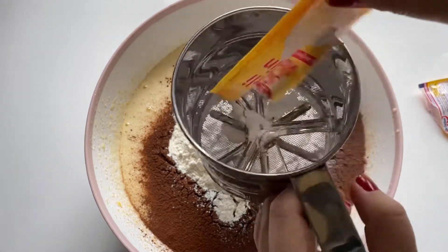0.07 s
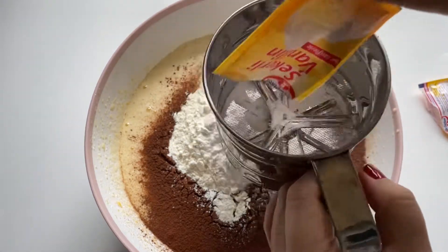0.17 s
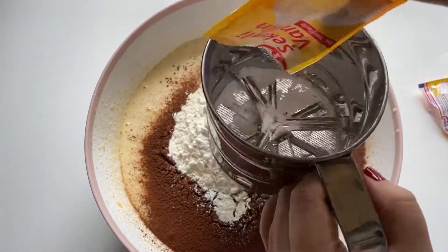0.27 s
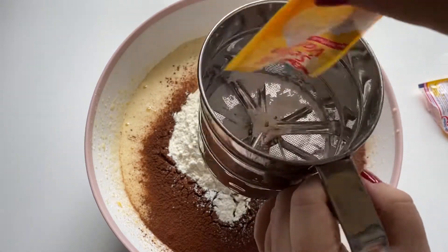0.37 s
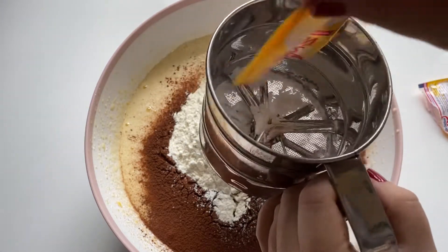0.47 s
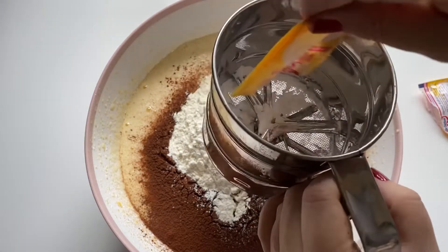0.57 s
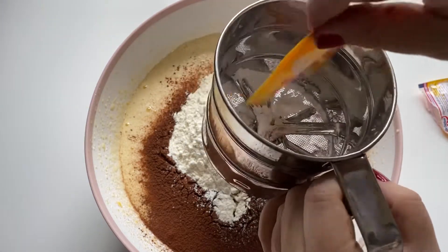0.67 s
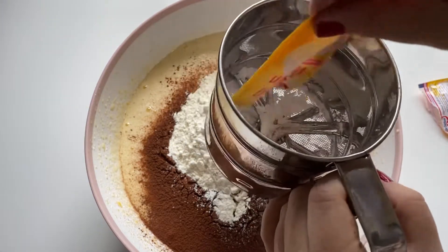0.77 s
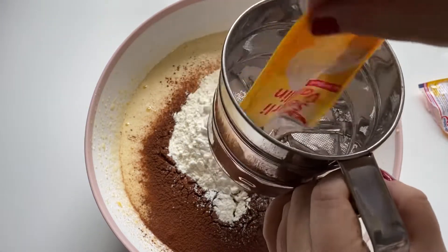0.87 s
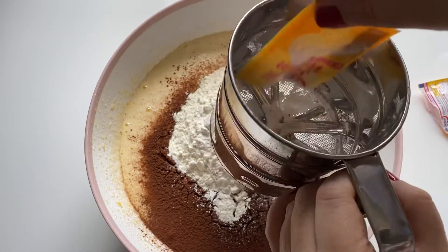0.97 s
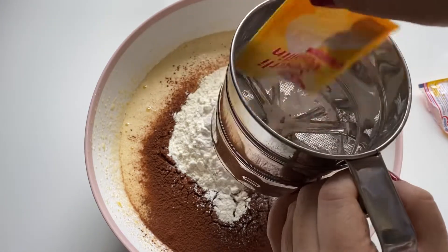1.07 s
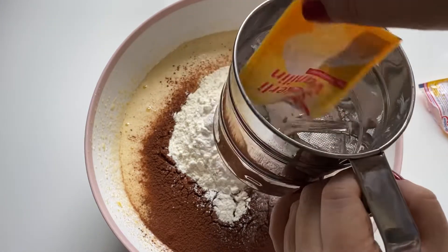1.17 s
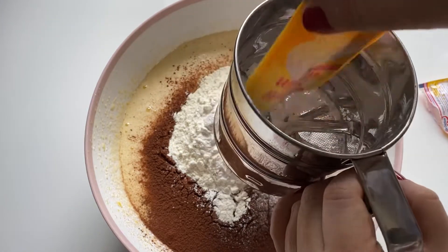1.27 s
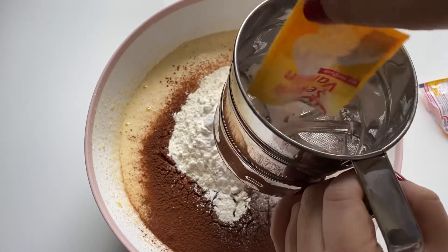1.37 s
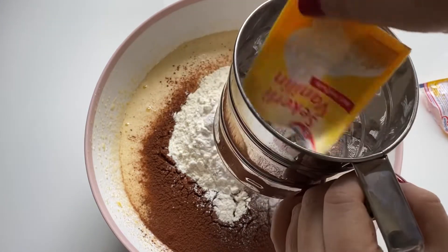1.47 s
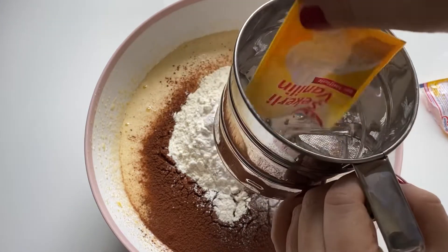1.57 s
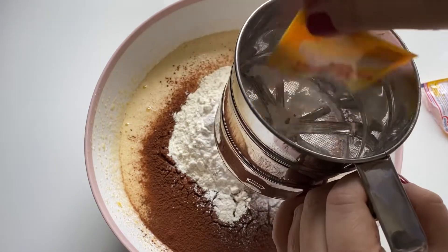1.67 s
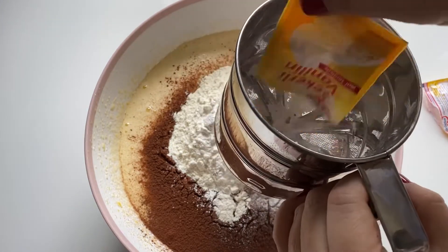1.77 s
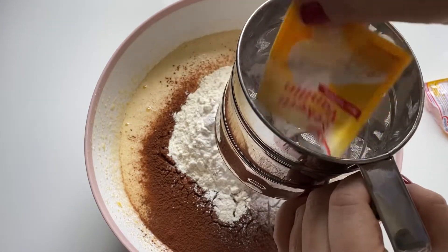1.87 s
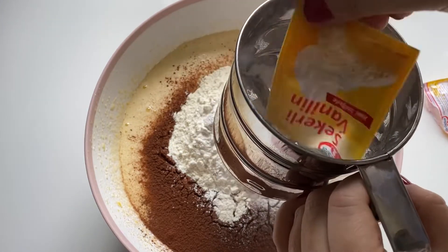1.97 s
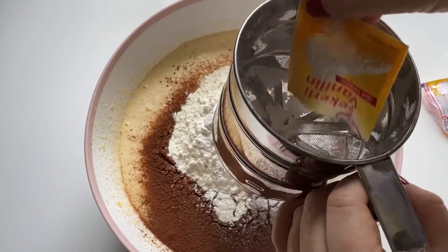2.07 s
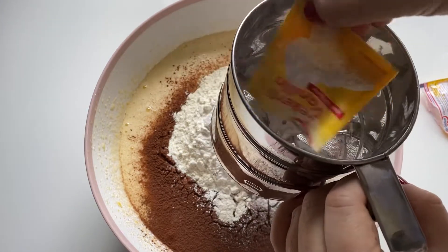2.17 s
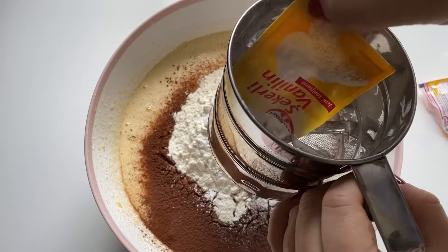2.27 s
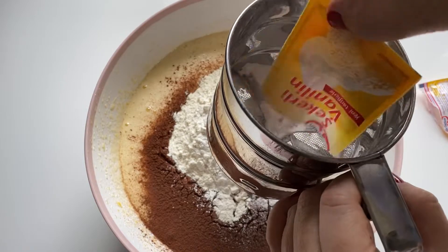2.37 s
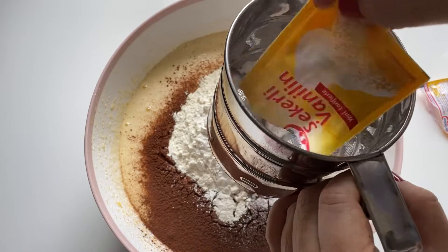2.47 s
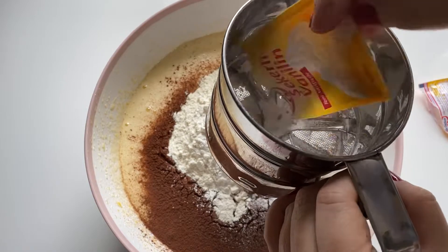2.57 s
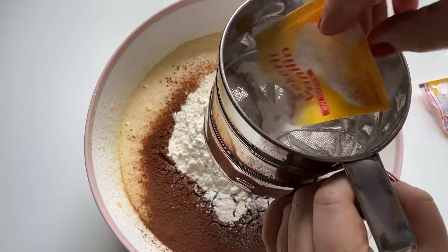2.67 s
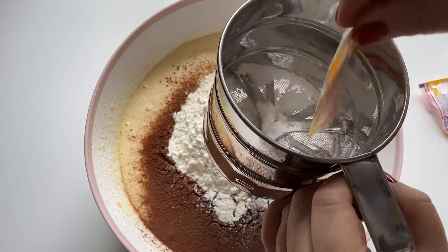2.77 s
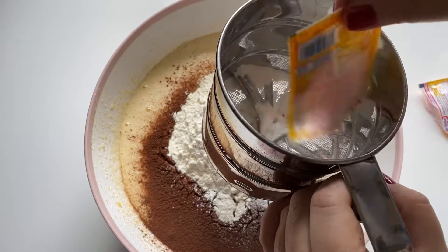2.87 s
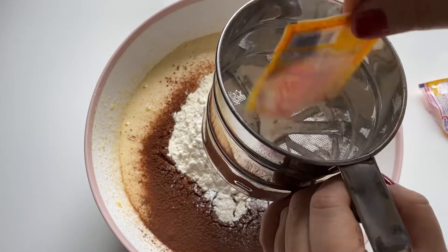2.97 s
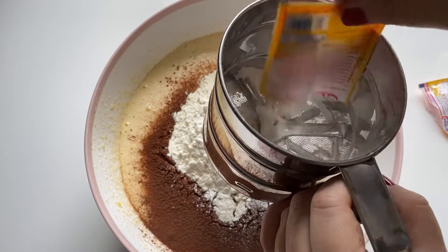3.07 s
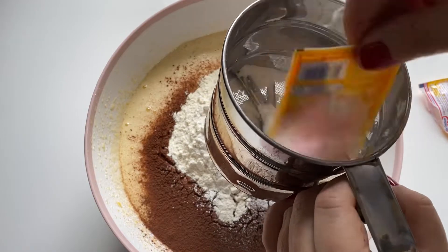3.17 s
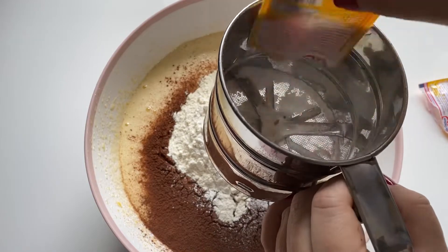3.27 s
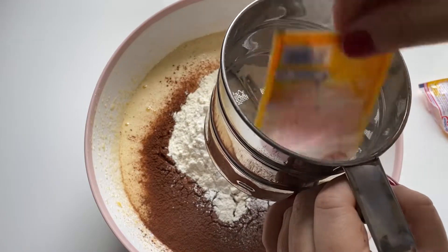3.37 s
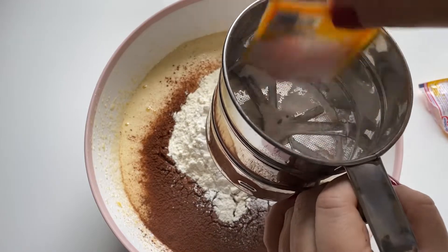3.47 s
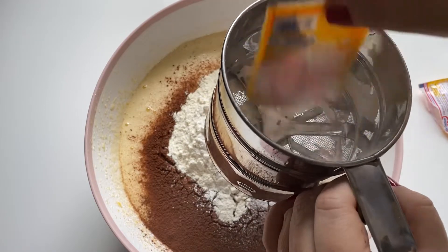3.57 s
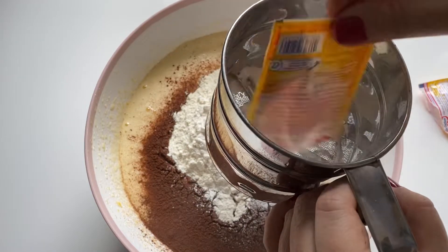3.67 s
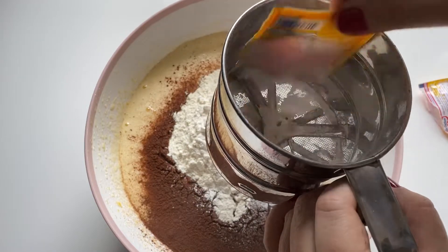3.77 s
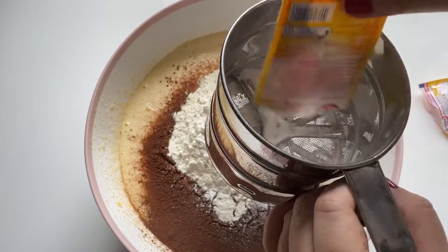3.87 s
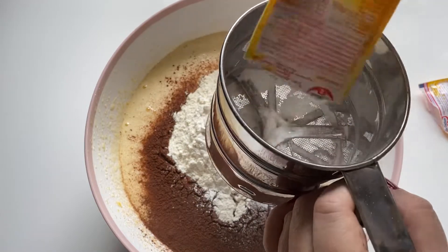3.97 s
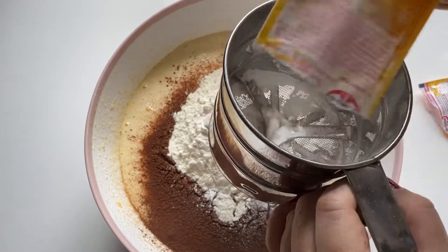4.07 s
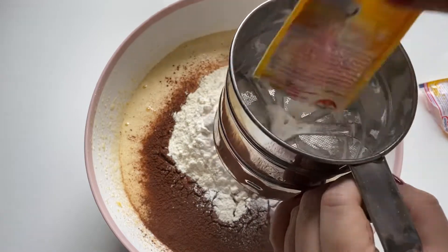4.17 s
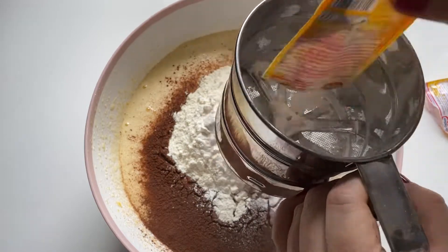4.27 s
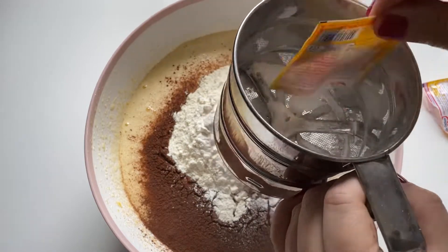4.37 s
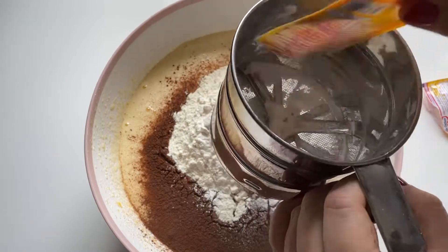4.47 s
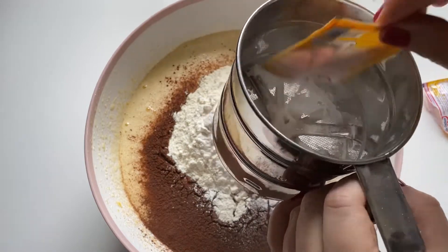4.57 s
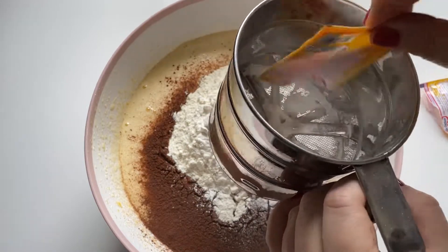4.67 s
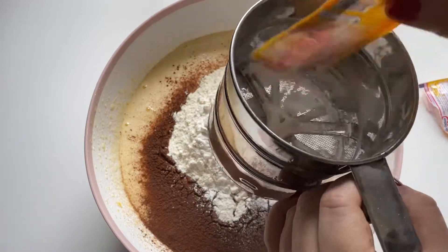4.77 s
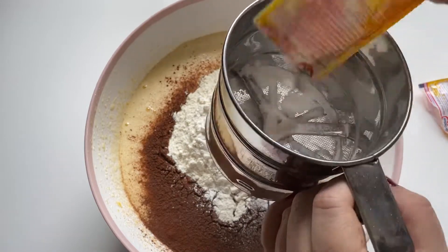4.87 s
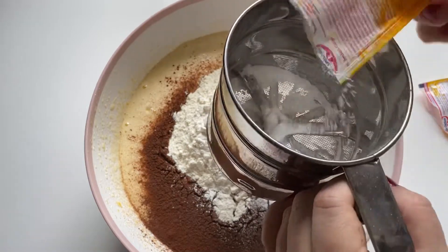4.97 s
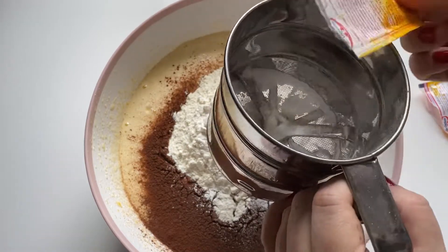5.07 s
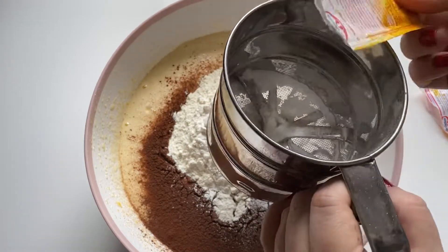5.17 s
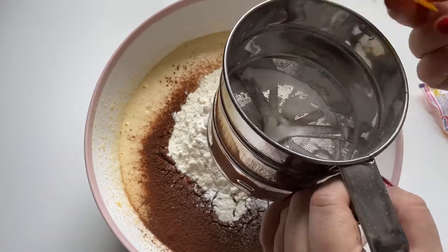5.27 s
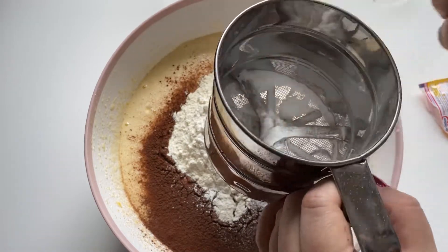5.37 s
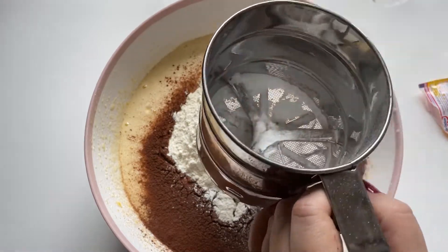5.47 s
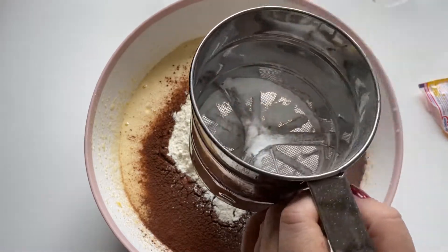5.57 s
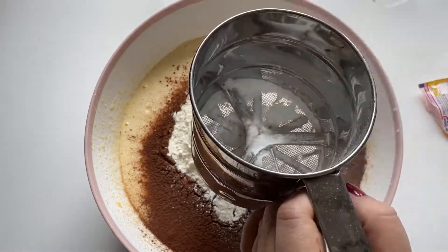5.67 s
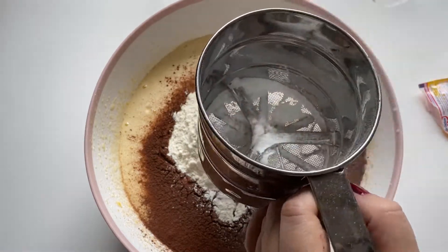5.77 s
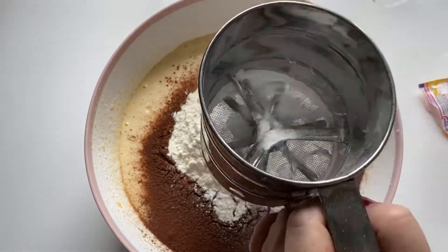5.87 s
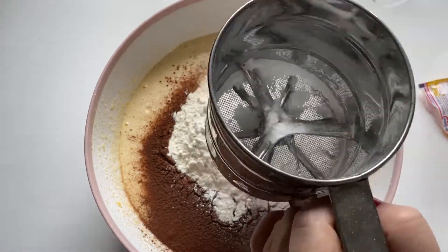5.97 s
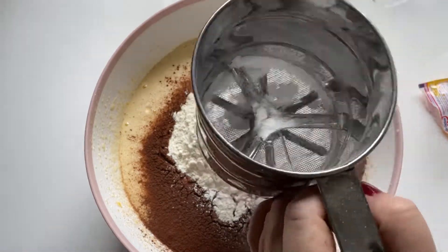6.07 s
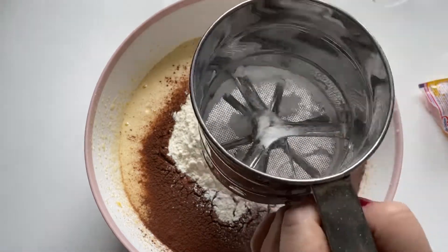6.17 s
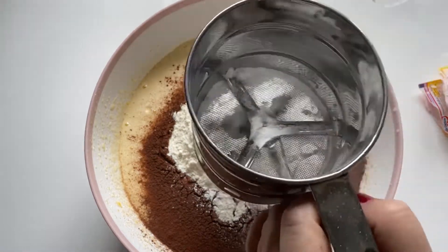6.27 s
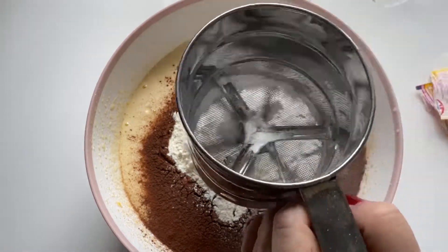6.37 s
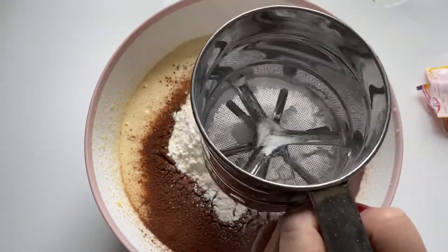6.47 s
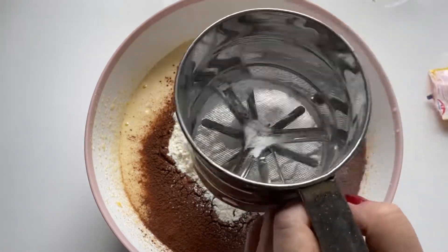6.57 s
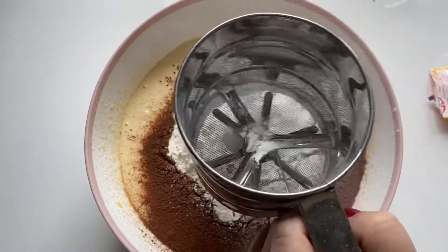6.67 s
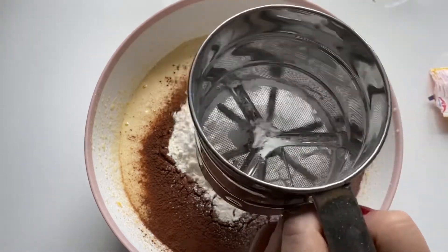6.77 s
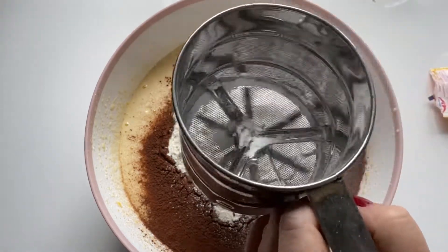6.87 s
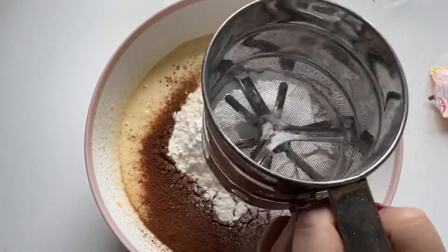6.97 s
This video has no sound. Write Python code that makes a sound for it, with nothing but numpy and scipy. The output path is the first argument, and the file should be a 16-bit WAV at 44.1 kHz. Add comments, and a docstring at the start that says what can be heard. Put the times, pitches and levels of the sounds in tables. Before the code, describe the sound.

Close up in a small kitchen, paper crinkles and flaps as a sachet is shaken, with soft hisses of sugar and a few dry taps against a steel sifter. The rustling thins out and stops. Then comes the louder sound of the sifter being worked, four quick squeezes of scraping wire and sharp, ringing metal clacks. An appliance hums faintly underneath.

```python
"""Paper crackles and sugar trickles: a sachet is shaken empty over a steel flour sifter, and each
shake buckles the paper and lets it snap back. Then the sifter's handle is squeezed four times:
its stirring wires rasp over the mesh, clack against a stop and spring back, ringing the steel can.
An appliance hums low in the small kitchen. The two ports (openings) of a close microphone
hear it all slightly apart in time."""
import sys
import numpy as np
from scipy import signal
from scipy.fft import rfft, irfft, next_fast_len
from scipy.io import wavfile
from scipy.ndimage import uniform_filter1d, map_coordinates

SR = 44100
rng = np.random.default_rng(int(sys.argv[2]) if len(sys.argv) > 2 else 0)


def digitize_waveform(pressure):
    """Quantize a signal to 16-bit integers and store it at the path in sys.argv[1].

    Rows of a 2-D input are taken as channels; values are limited to [-1, 1].
    """
    field = np.atleast_2d(pressure).T
    bounded = np.clip(field, -1, 1)
    quanta = np.round(bounded * 32767).astype(np.int16)
    wavfile.write(sys.argv[1], SR, quanta)


N = 309582

# each shake buckles one panel of the sachet, crumples the paper and lets the panel snap back:
# (buckle time [s], rebound time [s], buckle [dB], crumple [dB], rebound [dB], panel pitch [Hz])
SHAKES = [(0.851, 0.888, -40.5, -44.5, -53, 4830), (0.9139, 0.934, -46, -42, -30.5, 4930),
          (1.0006, 1.0328, -35, -50, -29.5, 4030), (1.064, 1.085, -37, -48, -26, 9750),
          (1.1515, 1.1833, -35.5, -32.5, -28, 970), (1.2283, 1.2397, -34, -37.5, -30, 2225),
          (1.3077, 1.3186, -34, -40.5, -29.5, 1700), (1.357, 1.3746, -36.5, -35.5, -30, 5814),
          (1.4377, 1.4562, -25.5, -33, -36, 4830), (1.511, 1.5266, -24, -35, -25, 2332),
          (1.561, 1.5768, -34.5, -35.5, -31, 4630), (1.6228, 1.6424, -33, -36.5, -37.5, 2208),
          (1.6816, 1.7066, -38, -38, -26.5, 1810), (2.3349, 2.3493, -39.5, -59, -46, 898),
          (2.5204, 2.5462, -29, -41.5, -21, 9360), (2.883, 2.9257, -39, -51, -46, 890),
          (2.9866, 3.015, -42, -50, -44, 1693), (3.047, 3.0706, -25, -33, -24.5, 2069),
          (3.108, 3.1154, -37.5, -45, -30, 9800), (3.1685, 3.192, -33, -44, -36, 4798),
          (3.2524, 3.2841, -35.5, -45.5, -35.5, 3040), (3.3412, 3.3551, -31, -38.5, -32.5, 883.4),
          (3.4127, 3.4206, -31.5, -35.5, -31, 3478), (3.507, 3.525, -33.5, -39, -41.5, 1270),
          (3.583, 3.594, -30.5, -42.5, -51, 10640), (3.6472, 3.6686, -33.5, -38.5, -31.5, 4900),
          (3.7266, 3.7399, -33, -42, -37.5, 1695), (3.787, 3.804, -42.5, -40, -33.5, 2671),
          (3.8733, 3.8931, -32, -55, -42.5, 8802), (4.081, 4.0959, -52.5, -63, -47, 801),
          (4.184, 4.215, -49.5, -54, -44.5, 2692), (4.4795, 4.496, -40.5, -51, -35, 10670)]
# tone of cracking paper: (frequency [Hz], relative level [dB])
PAPER = [(60, -14), (250, -1.5), (560, -7.5), (780, 0.5), (1500, -0.5), (2200, -0.5), (2800, -0.5),
         (4800, 3.5), (8000, -2), (10500, -3), (13600, -9.5), (16000, -13.5)]
# each squeeze takes up the slack with a catch, rasps over the mesh and hits the stop:
# (catch time [s], stop time [s], catch [dB], rasp [dB], clack [dB])
SQUEEZES = [(6.005, 6.032, -35, -25, -14.5), (6.2543, 6.2762, -25.5, -22.5, -14.5),
            (6.5278, 6.5502, -26, -22, -15.5), (6.773, 6.794, -35, -23.5, -14.5)]
# the spring pulls the wires back and the loose linkage knocks:
# (start [s], length [s], rasp [dB], knock time [s], knock [dB])
RETURNS = [(5.79, 0.12, -24.5, 5.872, -26.5), (6.085, 0.093, -24.5, 6.172, -22.5),
           (6.333, 0.12, -23.5, 6.355, -30), (6.603, 0.094, -24.5, 6.618, -37),
           (6.848, .11, -30.5, 6.875, -26.5)]


def paper_snaps(panel_db=8, panel_octaves=.25, t60=.014, shortening=.15, flutter_db=-21):
    """Each buckle creeps, cracks with one ringing panel and flutters on; bright cracks are shortest."""
    out, t = np.zeros(N), np.arange(SR // 12) / SR
    for s, db, tilt, ring_hz in buckles():
        def tone(hz):
            panel = panel_db * np.exp(-(np.log2((hz + 1) / ring_hz) / panel_octaves) ** 2)
            return amp(along(PAPER, hz) + tilt * np.log2((hz + 300) / 3000) + panel)
        crack, flutter, creep = filtered(rng.standard_normal((3, len(t))), tone)
        # the slow bending around the crack is duller than the crack itself
        flutter, creep = filtered(np.array([flutter, creep]), lambda hz: 1 / np.hypot(1, hz / 7000))
        ragged = amp(4 * map_coordinates(rng.standard_normal(40), [t * 400]))
        crack = crack * fade(t, .00012, t60 * np.exp(-shortening * tilt))
        flutter = amp(flutter_db) * flutter * ragged * fade(t, .0015, .053)
        add(out, s, amp(db) * struck(crack + flutter))
        # the crease gives way little by little just before it snaps, more softly if the snap is bright
        creep = struck(creep * ragged[::-1] * fade(t, .0001, .021))[:SR // 40][::-1]
        add(out, s - len(creep) / SR, amp(db - 17.5 - 1.1 * tilt) * creep)
    return out


def buckles(crumples_per_s=90, scatter_db=3.5, low_hz=1200, high_hz=9000, rebound_tilt=.83):
    """Lists every buckle of the paper, from single snaps and from shakes, in the columns below."""
    # single paper snaps, between or during the shakes:
    # (time [s], level [dB], brightness [dB per octave], panel pitch [Hz])
    single_snaps = [(.056, -38.5, 0, 3030), (.3654, -44.5, -3.5, 3570), (.4236, -44.5, 1, 5100),
                    (.4811, -46, -1.5, 2080), (.5958, -44.5, -2.5, 1040), (.6454, -44.5, -2, 1300),
                    (.776, -54.5, -4, 1300), (.871, -41, 3.5, 2200), (1.11, -38, 4, 10500),
                    (1.771, -31, 0.5, 8800), (1.8309, -32, 2, 1754), (1.9514, -36, 11, 10540),
                    (2.2297, -46.5, -2.5, 5990), (2.593, -47, -2, 2810), (2.6693, -41.5, 0, 2200),
                    (3.388, -42.5, 2, 1300), (3.9612, -46, -5.5, 1640), (4.3432, -39, 1, 8550),
                    (4.4215, -46, 1, 8080), (4.5106, -36, 0.5, 6110), (4.576, -48.5, -3, 1300),
                    (4.8901, -40.5, -0.5, 6070), (5.01, -43.5, -2, 1740)]
    rows = list(single_snaps)
    tilt = lambda db: .2129 * (db + 34.5)  # harder snaps are brighter
    chance = rng.random((len(SHAKES), 12, 3))
    for (s, end, buckle_db, crumple_db, rebound_db, hz), draws in zip(SHAKES, chance):
        rows.append((s, buckle_db, tilt(buckle_db), hz))
        rows.append((end, rebound_db, tilt(rebound_db) + rebound_tilt, hz))
        span = end - s + .004  # small crumples go on until just after the rebound
        count = max(1, int(span * crumples_per_s))
        for k, (when, size, panel) in enumerate(draws[:count]):
            start = s + span * (k + .5 + when / 2) / count
            db = crumple_db + scatter_db * (2 * size - 1)
            rows.append((start, db, tilt(db), low_hz * (high_hz / low_hz) ** panel))
    return rows


def pouring(rub_db=-1, crinkle_db=-4, trickle_db=2, throw_lag_s=.014):
    """The flexing sachet rustles and crinkles while sugar slides out onto the mesh."""
    # how much the hand flexes the sachet: (time [s], level [dB])
    flexing = [(0.0, -61), (0.37, -62), (0.69, -65), (0.91, -51), (1.04, -50), (1.57, -50.5), (1.95, -64.5),
               (2.91, -62), (3.04, -69), (3.25, -56.5), (3.35, -57), (3.75, -50), (3.96, -56.5),
               (4.18, -67), (4.39, -66.5), (4.51, -64), (5.19, -73), (5.75, -74)]
    # runs of sugar slide out: (middle [s], half length [s], trickle on mesh [dB], rub on paper [dB])
    pours = [(0.048, 0.054, -70, -54.5), (0.501, 0.016, -55.5, -62), (0.68, 0.034, -60, -59.5),
             (1.946, 0.058, -60, -57.5), (2.1, .059, -58.5, -65), (2.263, 0.12, -63.5, -60),
             (2.55, .08, -68.5, -54), (2.703, 0.036, -53, -56.5), (2.895, 0.053, -52, -56),
             (3.015, 0.035, -50, -60), (4.222, 0.057, -56, -60.5), (4.395, 0.052, -57, -63),
             (4.542, 0.053, -53, -53.5), (4.683, 0.05, -53.5, -54.5), (4.887, 0.085, -61.5, -58.5),
             (5.565, 0.063, -75.5, -84.5)]
    # tones of rubbing paper and of falling sugar: (frequency [Hz], relative level [dB])
    rub_tone = [(80, -9.5), (300, 3), (560, -1.5), (780, 7.5), (1400, -7.5), (2150, 0), (2800, -5.5),
                (4800, -1), (8000, -14), (16000, -23)]
    sugar_tone = [(200, -48), (1500, -1), (3500, -14), (6000, -9), (9500, 6), (12000, -1.5), (16000, 0)]
    t = np.arange(N) / SR
    flexed = amp(np.interp(t, *np.transpose(flexing)))
    # each shake throws some sugar a moment later
    thrown = sum(amp(db) * swell(t, s + throw_lag_s, .012) for s, _, _, db, _, _ in SHAKES)
    poured, rubbed = sum(amp(levels)[:, None] * swell(t, s, length) for s, length, *levels in pours)
    rustle = amp(-9) * flexed + amp(-7.5) * thrown + rubbed
    trickle = amp(-13.5) * flexed + amp(-29) * thrown + poured
    rub = shifting(coloured(grains(rate=3500, spread_db=5), rub_tone), depth_db=3.5)
    rub = unit(rub * amp(2.5 * wobble(90)))
    tiny_cracks = signal.fftconvolve(grains(rate=70, spread_db=3), fade(t[:SR // 50], .0002, .012))[:N]
    crinkle = unit(tiny_cracks * shifting(coloured(rng.standard_normal(N), PAPER), depth_db=4))
    sugar = unit(coloured(grains(rate=7000, spread_db=4), sugar_tone) * amp(1.5 * wobble(60)))
    return rustle * (amp(rub_db) * rub + amp(crinkle_db) * crinkle) + amp(trickle_db) * trickle * sugar


def mesh_rasp(sharpness=2.65, lead_s=.022, overrun_s=.038):
    """The wires skip and catch on the mesh, loudest where each sweep is fastest."""
    tone = [(50, -40), (180, -6.5), (400, -12.5), (620, -16.5), (950, -6), (1550, -3), (2400, 1.5),
            (4400, -1.5), (6000, 4.5), (7500, -4.5), (9500, 5), (11500, -2.5), (15700, -4)]  # scraped wire mesh: (frequency [Hz], relative level [dB])
    # the wires move from before the catch until after the stop
    sweeps = [(catch - lead_s, lead_s + stop - catch + overrun_s, db)
              for catch, stop, _, db, _ in SQUEEZES]
    sweeps += [row[:3] for row in RETURNS]
    loudness = np.zeros(N)
    for s, length, db in sweeps:
        speed = np.abs(np.sin(np.linspace(0, np.pi, int(length * SR))))
        add(loudness, s, amp(db) * speed ** sharpness)
    scrape = shifting(coloured(grains(rate=7500, spread_db=4), tone), depth_db=2.8)
    return loudness * unit(scrape * amp(2 * wobble(450)))


def linkage_clacks(stop_t60=.046, knock_t60=.075, chatter_db=-11, chatter_t60=.11):
    """The linkage hits a stop and its loose parts chatter; the crack is longer on the slack way back."""
    tone = [(60, -27), (200, -1), (600, -6), (950, 0), (1500, -3), (2500, 5.5), (5700, 6), (8000, 6.5),
            (11000, 7), (16000, -0.5)]  # a blow on the stop: (frequency [Hz], relative level [dB])
    out, t = np.zeros(N), np.arange(SR // 8) / SR
    blows = [(s, db, stop_t60) for s, db in squeeze_blows()]
    blows += [(s, db, knock_t60) for *_, s, db in RETURNS]
    for s, db, t60 in blows:
        crack, chatter = coloured(rng.standard_normal((2, len(t))), tone)
        blow = crack * fade(t, .00015, t60) + amp(chatter_db) * chatter * fade(t, .0015, chatter_t60)
        add(out, s, amp(db) * struck(blow))
    return out


def stop_pings(t60=.016):
    """The stop itself pings, damped at once by the hand around it."""
    out, t = np.zeros(N), np.arange(SR // 20) / SR
    for s, db in squeeze_blows():
        hz = rng.normal(5740, 50)
        add(out, s, amp(db) * struck(np.sin(2 * np.pi * hz * t) * fade(t, .00078, t60)))
    return out


def squeeze_blows():
    """Lists the catch and the final clack of each squeeze: (time [s], level [dB])."""
    return [blow for catch, stop, catch_db, _, clack_db in SQUEEZES
            for blow in [(catch, catch_db), (stop, clack_db)]]


def steel_can(x):
    """The thin steel wall rings with whatever scrapes or strikes it."""
    notes = [(990, 0, .03), (1160, 10, .13), (1446, 9, .1), (1800, -3, .04), (1876, 6, .07), (1950, 0, .05),
             (2144, -2, .08), (2354, 3, .08), (2425, 5, .11), (2545, -4, .06), (2680, -1, .06),
             (3100, -6, .05), (3418, 3, .13), (3622, 6, .14), (3700, 3, .11), (4199, -2, .08),
             (4830, -10, .07), (5002, 0, .1), (5300, 0, .04), (5600, -6, .03), (5990, -4, .05),
             (8480, -4, .05), (9454, -6, .05), (9824, -6, .06)]  # the wall's own notes: (pitch [Hz], boost [dB], time to fade by 60 dB [s])
    t = np.arange(SR // 5) / SR
    ring = np.zeros(len(t))
    for hz, db, t60 in notes:
        damping = np.log(1000) / t60
        ring += amp(db) * 2 * damping / SR * np.cos(2 * np.pi * hz * t) * np.exp(-damping * t)
    return signal.fftconvolve(x, ring)[:N]


def edge_taps(width_octaves=.38, t60=.016):
    """The stiff edge of the sachet knocks on the sifter's wall, dry and hollow."""
    taps = [(1.83, -33.5, 1903), (1.9519, -42.5, 1920), (2.469, -50.5, 1811), (2.828, -51.5, 2000),
            (5.0122, -44.5, 1806)]  # each knock: (time [s], level [dB], pitch [Hz])
    out, t = np.zeros(N), np.arange(SR // 12) / SR
    for s, db, pitch in taps:
        band = lambda hz: 1 / (1 + (np.log2((hz + 1) / pitch) / width_octaves * 2) ** 2)
        hollow = filtered(rng.standard_normal(len(t)), band)
        add(out, s, amp(db) * struck(hollow * fade(t, .0002, t60)))
    return out


def air_puffs(low_hz=55, high_hz=330, swing_hz=54, swing_db=-1):
    """The flat of the sachet flaps: a dull burst of air, then a low swing."""
    puffs = [(3.168, -28.5), (3.337, -28), (3.509, -34.5)]  # hard shakes push air at the microphone: (time [s], level [dB])
    out, t = np.zeros(N), np.arange(SR // 5) / SR
    swing = np.sin(2 * np.pi * swing_hz * t) * fade(t, .016, .11)
    band = lambda hz: hz ** 2 / (hz ** 2 + low_hz ** 2) / (1 + (hz / high_hz) ** 6)
    for s, db in puffs:
        flap = unit(filtered(rng.standard_normal(len(t)), band)) * fade(t, .004, .049)
        add(out, s, amp(db) * (flap + amp(swing_db) * swing))
    return out


def bowl_echoes(x):
    """Quick echoes, thin in the bass, bounce off the bowl and table."""
    t = np.arange(SR // 40) / SR
    bounces = rng.standard_normal(len(t)) * fade(t, .0005, .02)
    echoes = signal.fftconvolve(x, bounces / np.linalg.norm(bounces))[:N]
    return filtered(echoes, lambda hz: hz / (hz + 250))


def kitchen_echo(x, places=4):
    """The room answers with two unlike washes of echo, which change as the hands move."""
    fade_times = [(150, 1), (1000, 0.5), (4000, 0.42), (9000, 0.14), (16000, 0.38)]  # the room's echo: (frequency [Hz], time to fade by 60 dB [s])
    hz, t, noise = signal.stft(rng.standard_normal((places, 2, SR // 2)), SR, nperseg=256)
    fading = noise * fade(t + .001, .00078, along(fade_times, hz)[:, None])
    tails = signal.istft(fading, SR, nperseg=256)[1]
    tails = tails / np.linalg.norm(tails, axis=-1, keepdims=True)
    place = np.arange(N) * 6 // SR % places  # moves on six times a second
    return sum(signal.fftconvolve((x * (place == k))[None], tails[k], axes=1)[:, :N]
               for k in range(places))


def appliance_hum(air_db=-59):
    """A wavering hum over the low rush of the room, whose bass is alike at both ports."""
    notes = [(45, -71.5), (84, -58.5), (154, -66.5), (342, -73)]  # the appliance's notes: (pitch [Hz], level [dB])
    air_tone = [(20, -31.5), (32, -35.5), (45, 5), (60, 1.5), (110, 1), (200, -5), (350, -9), (550, -17.5),
                (1000, -27), (1700, -29.5), (4000, -43), (9000, -33), (16000, -39.5)]  # the rush of the room: (frequency [Hz], relative level [dB])
    t = np.arange(N) / SR
    hum = np.zeros(N)
    for hz, db in notes:
        level = amp(db + 1.1 * wobble(4.12)) * np.sqrt(2)
        hum += level * np.sin(2 * np.pi * hz * t + .59 * wobble(3.7))
    mid, side = amp(air_db) * coloured(rng.standard_normal((2, N)), air_tone)
    side = filtered(side, lambda hz: .5 * hz / (hz + 400))
    return hum + mid + np.array([side, -side])


def microphone_ports(pair):
    """The left port hears the treble a little before the right, and is slightly quieter."""
    lead = [(300, 0), (1400, -.35), (2300, .2), (2750, .95), (3300, .55), (4300, .5), (5000, .1),
            (6100, 1.7), (7200, 3.1), (8700, 4.4), (10500, 6.3), (11700, 7.1), (13400, 9.4), (16000, 12)]  # how far the left port is ahead: (frequency [Hz], phase [radians])
    balance = [(60, 0), (200, -1), (380, -.5), (700, -2.5), (1300, -1.4), (2400, -.9), (4400, -.5),
               (8000, 0)]  # level between the ports: (frequency [Hz], left minus right [dB])
    half = np.array([[.5], [-.5]])
    shift = lambda hz: np.exp(1j * np.interp(hz, *np.transpose(lead)) * half)
    return filtered(pair, lambda hz: shift(hz) * amp(along(balance, hz) * half))


def shifting(x, depth_db):
    """As the contact point moves, narrow bands of the sound come and go."""
    bands = signal.stft(x, nperseg=512)[2]
    patches = uniform_filter1d(rng.standard_normal(bands.shape), size=3, axis=0)
    patches = uniform_filter1d(patches, size=5, axis=1)
    return unit(signal.istft(bands * amp(depth_db * unit(patches)), nperseg=512)[1][:N])


def grains(rate, spread_db):
    """Random tiny impacts of uneven size, about rate of them a second."""
    size = amp(spread_db * np.clip(rng.standard_normal(N), -2, 2)) * rng.choice([-1, 1], N)
    return size * (rng.random(N) < rate / SR)


def wobble(rate):
    """A smooth curve through rate random points a second."""
    return map_coordinates(rng.standard_normal(int(N * rate / SR) + 4), [np.arange(N) * rate / SR])


def fade(t, rise, t60):
    """The shape of a blow: a quick rise, then a fall of 60 dB every t60 seconds."""
    return (1 - np.exp(-t / rise)) * np.exp(-np.log(1000) * t / t60)


def swell(t, middle, half_length):
    """A smooth rise and fall."""
    return np.exp(-1.4 * ((t - middle) / half_length) ** 2)


def filtered(x, response):
    """Multiplies each frequency in x by response(hz)."""
    n = x.shape[-1]
    padded = next_fast_len(n + 4096)
    return irfft(rfft(x, padded) * response(np.fft.rfftfreq(padded, 1 / SR)), padded)[..., :n]


def coloured(x, tone):
    """Shapes x with a tone table, at average level 1."""
    return unit(filtered(x, lambda hz: amp(along(tone, hz))))


def along(points, hz):
    """Reads between the rows of a (frequency [Hz], value) table, on a scale of octaves."""
    frequencies, values = np.transpose(points)
    return np.interp(np.log(hz + 1), np.log(frequencies + 1), values)


def amp(db):
    """Turns decibels into a multiplier."""
    return 10 ** (np.asarray(db) / 20)


def unit(x):
    """Scales x to an average (rms) level of 1."""
    return x / np.sqrt(np.mean(x ** 2) + 1e-20)


def struck(x):
    """Scales a blow to average level 1 over its first 5 ms."""
    return x / np.sqrt(np.mean(x[:SR // 200] ** 2))


def add(track, s, sound):
    """Lays a sound into the track at s seconds."""
    part = track[int(s * SR):][:len(sound)]
    part += sound[:len(part)]


def scene(sachet_ring_db=-13, sifter_db=-1.5, sachet_room_db=-15.5, sifter_room_db=-13):
    """Sachet and sifter both ring the can and echo in the kitchen, over the hum."""
    sachet = paper_snaps() + pouring() + edge_taps()
    sachet = sachet + amp(sachet_ring_db) * steel_can(sachet)
    sifter = amp(sifter_db) * (mesh_rasp() + linkage_clacks())
    sifter = sifter + steel_can(sifter)
    room, room_side = kitchen_echo(amp(sachet_room_db) * sachet + amp(sifter_room_db) * sifter)
    side = amp(-3) * room_side + amp(-11) * bowl_echoes(sachet + sifter)  # opposite in left and right
    direct = sachet + sifter + stop_pings() + air_puffs()
    return microphone_ports(direct + room + np.array([side, -side]) + appliance_hum())


def record(dry, ceiling=.85, top_hz=15850):
    """The loudest clacks are softly rounded off and the highest treble is cut away."""
    rounded = dry / (1 + np.abs(dry / ceiling) ** 6) ** (1 / 6)
    return filtered(rounded, lambda hz: 1 / (1 + (hz / top_hz) ** 160))


dry = scene()
out = record(dry)
digitize_waveform(out)
```